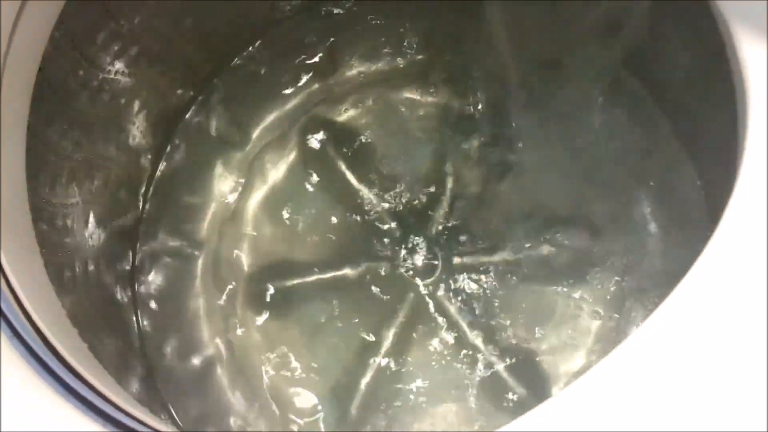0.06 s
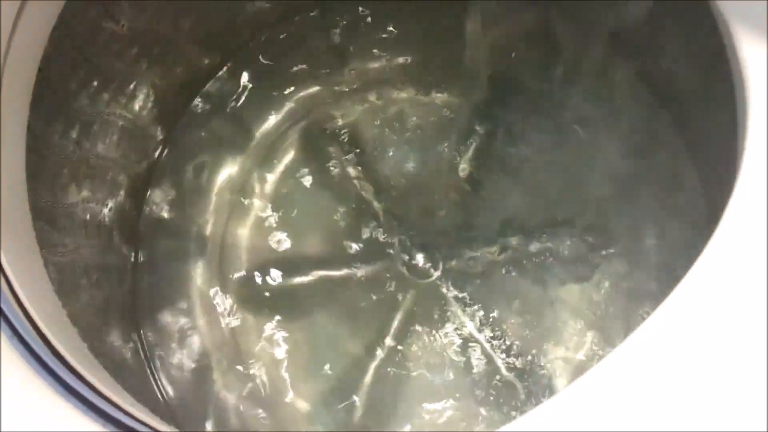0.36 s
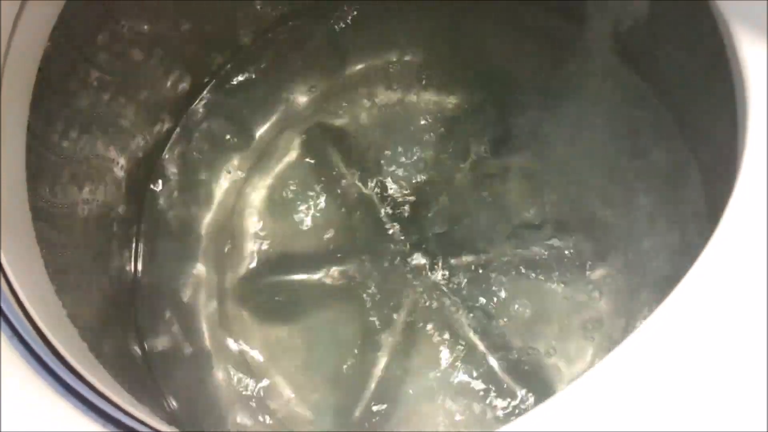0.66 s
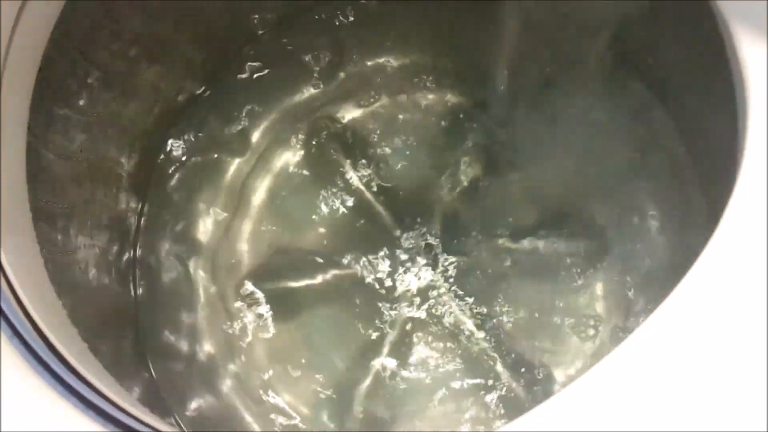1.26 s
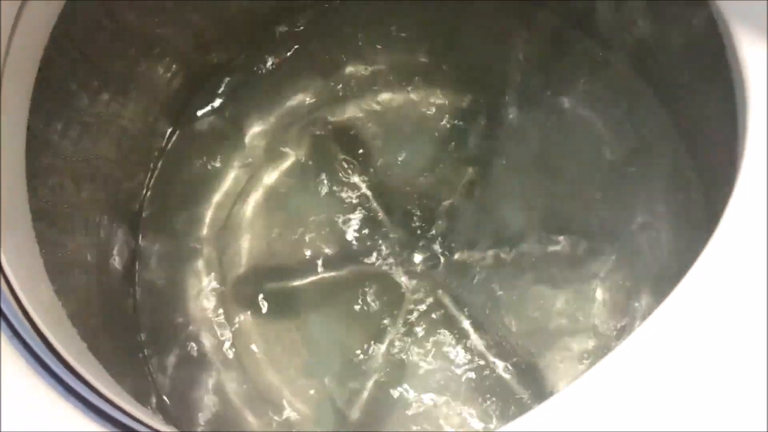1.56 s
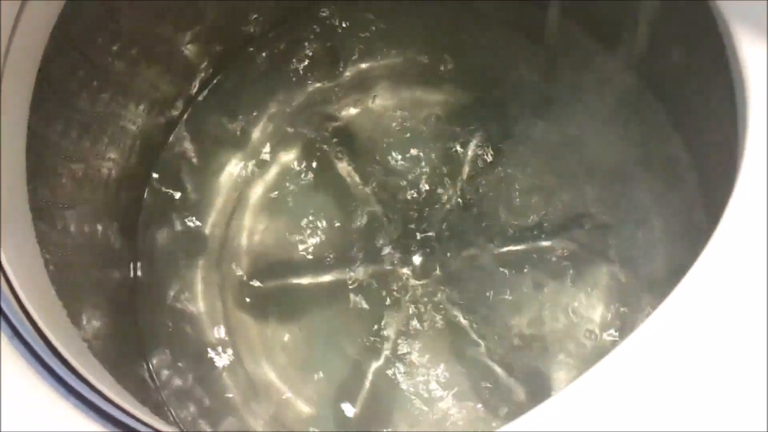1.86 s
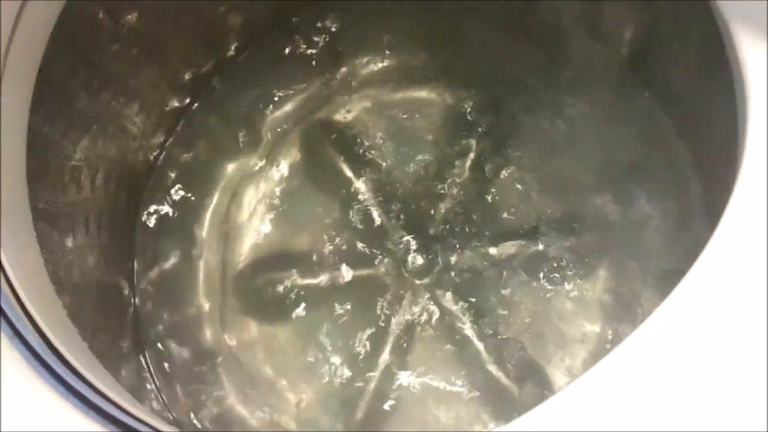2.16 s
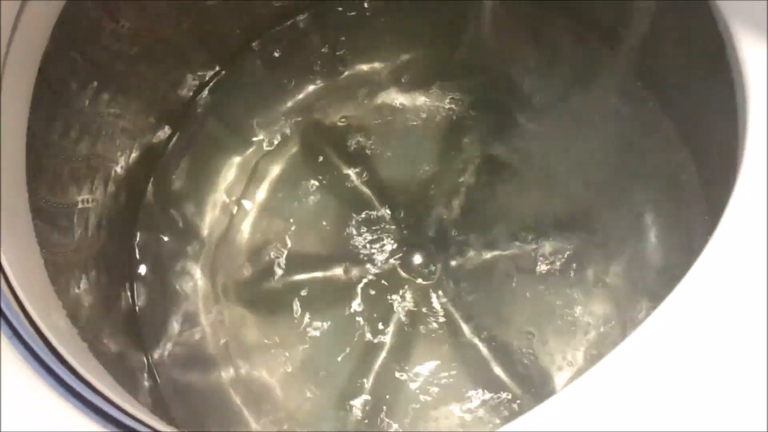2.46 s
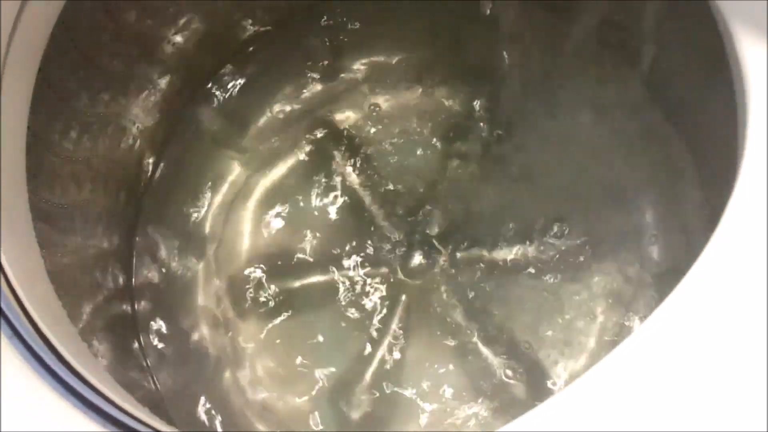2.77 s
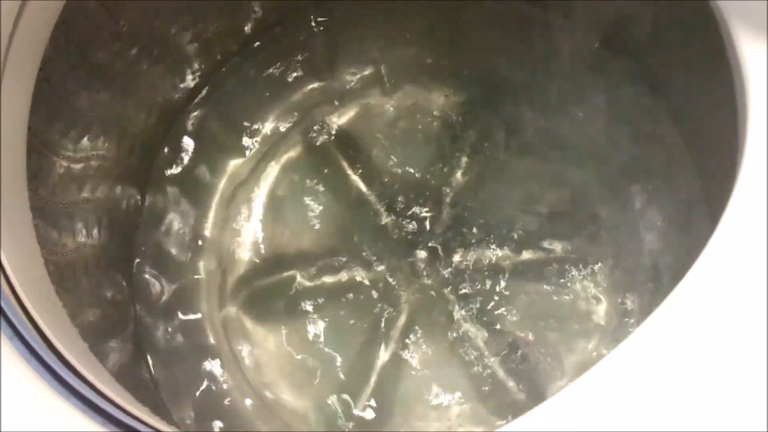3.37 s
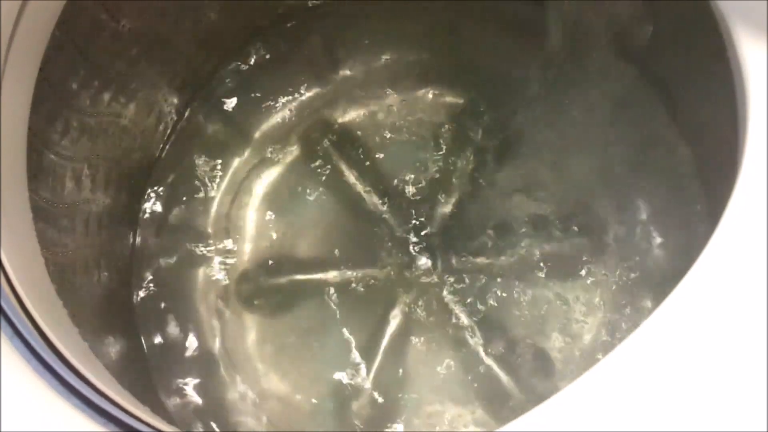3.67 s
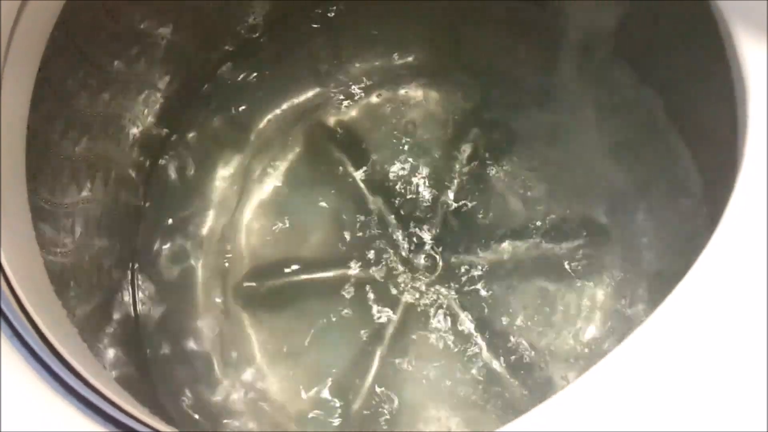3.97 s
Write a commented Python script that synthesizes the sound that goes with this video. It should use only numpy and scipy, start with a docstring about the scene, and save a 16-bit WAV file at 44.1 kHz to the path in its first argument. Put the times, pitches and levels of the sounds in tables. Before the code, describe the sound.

Heard from close above, a stream of water splashes into a filling washing machine, with tinkling bubbles, fat drips and small gurgles. The splashing dips briefly and returns, echoing in the metal drum while the machine hums and rumbles softly.

```python
"""Water falls into the part-filled steel drum of a top-loading washer, one microphone close overhead.
From the start, drops patter on the surface and trap ringing bubbles, over valve hum and a low rumble.
Almost at once a pocket of air gulps, a fat drop slaps and a jet plunges; these return now and then.
The splashing eases around two seconds in, swells near three, dips and surges briefly at the end.
Throughout, the drum rings and echoes with the water."""
import sys
import numpy as np
from scipy import signal
from scipy.fft import rfft, irfft
from scipy.io import wavfile

SR = 44100
rng = np.random.default_rng(int(sys.argv[2]) if len(sys.argv) > 2 else 0)


def wav_record(signal):
    """Record a signal, one row per channel, as 16-bit PCM in the file named by sys.argv[1]."""
    frames = np.transpose(np.atleast_2d(signal))
    bounded = np.clip(frames, -1, 1)
    # unit amplitude maps onto the largest positive 16-bit level
    quanta = np.round(bounded * 32767).astype(np.int16)
    wavfile.write(sys.argv[1], SR, quanta)


N = 176400
TIME = np.arange(N) / SR

# How hard the stream splashes. Each row: time in seconds, relative level in dB.
SPLASH_LEVEL = [(0.0, -14.5), (0.06, -21.5), (0.21, -20), (0.243, -25), (0.275, -20.5), (0.62, -23),
                (0.79, -20), (0.88, -26.5), (1.08, -21), (1.15, -25.5), (1.195, -19.5), (1.23, -20.5),
                (1.32, -18.5), (1.65, -20), (1.71, -21), (1.765, -17.5), (1.9, -27.5), (1.96, -24),
                (2.01, -27), (2.21, -29), (2.33, -25), (2.43, -31), (2.48, -24.5), (2.55, -23.5),
                (2.69, -19.5), (2.83, -21.5), (3.05, -18), (3.3, -23.5), (3.44, -24.5), (3.6, -27),
                (3.64, -24), (3.77, -25.5), (3.93, -20), (4.0, -26)]
# Tone colours of the steady layers. Each row: frequency in Hz, relative gain in dB.
SPRAY_COLOUR = [(500, -36), (1200, -26.5), (2200, -18), (3500, -7), (4400, -1.5), (5250, 3), (6000, -4.5),
                (7000, -11), (8300, -24), (10800, -41), (12500, -25), (15500, -41.5)]
MIST_COLOUR = [(2000, -30.5), (4000, -26), (5250, 10), (7000, -19), (8500, -8.5), (10800, -5.5),
               (12500, -17), (15500, -48)]
TINKLE_COLOUR = [(2000, -10), (2600, -7), (3500, -3), (4400, -6), (5250, 5.5), (6000, -1.5), (7000, -9.5),
                 (8500, -15), (11000, -29)]
FIZZ_COLOUR = [(550, -13), (800, -7.5), (1200, -8.5), (1600, -2), (2400, -1.5), (5000, -6), (7000, -15.5)]
GURGLE_COLOUR = [(100, -7.5), (150, -1.5), (220, -0.5), (290, -7.5), (370, -5), (450, -2.5), (560, -11.5),
                 (750, -21)]
RUMBLE_COLOUR = [(15, 1.5), (29, -0.5), (44, -0.5), (58, 6), (75, -6), (110, -3), (200, -9), (400, -26),
                 (800, -28.5), (3000, -71)]
# Hum of the inlet valve. Each row: frequency in Hz, rms level in dB.
VALVE_HUM = [(29.5, -45.5), (60, -58.5), (120, -54.5), (180, -58)]
# Modes of the air in the drum. Each row: frequency in Hz, relative gain in dB.
AIR_MODES = [(357, -1), (390, -1), (560, 0), (980, -3), (1085, -1), (1263, -2), (1415, -2), (1550, -4),
             (1976, -5), (2231, -6), (2499, -7), (2649, -7)]
# Air trapped under the surface. Each row: start in seconds, relative level in dB, pitch in Hz.
AIR_GULPS = [(0.04, -20.5, 191), (0.245, -27, 215), (0.733, -28, 444), (1.229, -22.5, 178),
             (1.232, -23, 460), (1.33, -27, 353), (1.48, -25.5, 205), (1.698, -27, 439), (2.14, -35, 550),
             (2.44, -31, 750), (2.451, -24, 180), (2.489, -23, 205), (2.698, -25, 215), (2.872, -23, 365),
             (3.102, -26, 180), (3.105, -29, 400), (3.425, -27, 425), (3.715, -26, 215), (3.948, -25, 198)]
JET_PLUNGES = [(0.11, -26, 2570), (0.186, -22, 2490), (0.464, -30, 1300), (0.733, -29, 1650),
               (1.2855, -22, 2000), (1.572, -25, 1790), (1.6367, -17.5, 1950), (1.755, -21, 2700),
               (2.278, -33, 1250), (2.8539, -19, 2190), (2.915, -22, 2200), (3.089, -23, 2700),
               (3.6277, -23, 2900), (3.66, -25, 2180), (3.9085, -21, 2420)]
# Slaps of fat drops. Each row: start in seconds, relative level in dB, frequency in Hz of the ring
# it sets off, mostly the microphone's resonance.
FAT_DROPS = [(0.0837, -6, 5320), (0.1835, -9, 4400), (0.2653, -7, 5470), (0.2714, -6, 5100),
             (0.3376, -10, 5240), (0.5382, -7, 5040), (0.7018, -5.5, 5250), (1.1623, -8.5, 5120),
             (1.4272, -7, 5040), (1.6038, -7.5, 5120), (1.6297, -3.5, 4510), (1.7804, -5.5, 5050),
             (1.8277, -9, 3900), (1.8357, -9, 5600), (1.9425, -6, 5260), (2.2443, -13, 5510),
             (2.772, -7, 6200), (2.8489, -7.5, 5760), (2.9043, -9, 5010), (3.0066, -8.5, 4970),
             (3.1043, -4, 4600), (3.1787, -5, 4900), (3.2535, -4.5, 3540), (3.3513, -9.5, 5290),
             (3.4989, -9, 5390), (3.5533, -7, 5250), (3.636, -12, 4400)]

CLUMPS_PER_S, CLUMP_DECAY_S, CLUMP_DEPTH = 80, 0.006, 0.6
MIST_FOLLOWS, FIZZ_FOLLOWS, GURGLE_FOLLOWS = 0.81, 0.76, 0.69   # share of the stream's swing in dB
BUBBLE_RISE = 0.07   # fraction by which the pitch climbs
MODE_WIDTH_HZ, DRUM_T60_S, ECHO_DB, FIRST_ECHO_S = 18, 0.13, -4.5, 0.001813
CLOUD_COUNT, CLOUD_DB, CLOUD_SPAN_S, CLOUD_OCTAVES = 14, -11, 0.032, 0.33
SCATTER_DB, SCATTER_DECAY_S, SLAP_SOFTNESS_HZ = -9, 0.0065, 7900
CUTOFF_HZ = 15500


def from_db(db):
    """Decibels to gain."""
    return 10 ** (np.asarray(db) / 20)


def rms_one(x):
    """Scale to unit power."""
    return x / np.sqrt(np.mean(x ** 2) + 1e-20)


def add(out, s, sound):
    """Mix a sound in at s seconds."""
    start = int(np.clip(s * SR, 0, N - 1))
    out[start:start + len(sound)] += sound[:N - start]


def colour(x, points):
    """Minimum-phase filter through (Hz, dB) points; the result has unit power."""
    hz, db = np.transpose(points)
    grid_hz = np.maximum(np.arange(N + 1) * SR / (2 * N), 1)
    gain = from_db(np.interp(np.log(grid_hz), np.log(hz), db))
    cepstrum = irfft(np.log(gain))
    response = np.exp(rfft(2 * cepstrum[:N], 2 * N))
    return rms_one(irfft(rfft(x, 2 * N) * response)[:N])


def dying(kicks, decay_s):
    """Each kick fades exponentially."""
    return signal.lfilter([1], [1, -np.exp(-1 / (decay_s * SR))], kicks + 1e-18)


def sizes(spread_db):
    """A random strength for each sample: many small, a few large, of either sign."""
    return from_db(spread_db * np.minimum(rng.exponential(1, N), 3.8)) * rng.choice([-1, 1], N)


def stream():
    """The strength of the splashing, as a gain over time."""
    return from_db(np.interp(TIME, *np.transpose(SPLASH_LEVEL)))


def clumping():
    """The stream breaks into clumps that start at once and thin out; overlapping clumps add in power."""
    starts = (rng.random(N) < CLUMPS_PER_S / SR) * rng.uniform(.5, 1, N)
    power = dying(starts, CLUMP_DECAY_S / 2)
    return 1 - CLUMP_DEPTH + CLUMP_DEPTH * rms_one(np.sqrt(power))


def patter(per_s, spread_db):
    """Drops land as random ticks of uneven size."""
    return (rng.random(N) < per_s / SR) * sizes(spread_db)


def spray():
    """Thousands of drops tick on the surface; the finest hiss in the same clumps and swell less."""
    clumps = clumping()
    drops = colour(clumps * patter(per_s=7000, spread_db=2.5), SPRAY_COLOUR)
    mist = colour(clumps * patter(per_s=7100, spread_db=4.5), MIST_COLOUR)
    return from_db(-5.5) * stream() * drops + from_db(-19) * stream() ** MIST_FOLLOWS * mist


def ring(hz, cycles):
    """A sine dies 60 dB over its cycles and climbs a little, as a bubble does nearing the surface."""
    turns = np.arange(int(cycles * SR / hz)) * hz / SR
    age = turns / cycles
    envelope = from_db(-60 * age) * (1 - np.exp(-2 * turns))
    return envelope * np.sin(2 * np.pi * turns * (1 + BUBBLE_RISE * age / 2))


def swarm(spectrum, per_s, spread_db, cycles):
    """Bubbles ring at random pitches across a spectrum, louder in clumps."""
    out = np.zeros(N)
    born = rng.random(N) < per_s / SR
    strength = sizes(spread_db) * clumping()
    hz = rng.uniform(spectrum[0][0], spectrum[-1][0], N)
    for i in np.flatnonzero(born):
        add(out, TIME[i], strength[i] * np.sqrt(hz[i]) * ring(hz[i], cycles))
    return colour(out, spectrum)


def bubbles():
    """Trapped air: tiny bubbles tinkle, larger ones fizz and plunge, the largest gurgle and gulp."""
    tinkle = swarm(TINKLE_COLOUR, per_s=3300, spread_db=4.5, cycles=79)
    fizz = swarm(FIZZ_COLOUR, per_s=2600, spread_db=1.3, cycles=41.5)
    gurgle = swarm(GURGLE_COLOUR, per_s=500, spread_db=1.7, cycles=14.6)
    tinkle *= from_db(-4.5) * stream()
    fizz *= from_db(-37.5) * rms_one(stream() ** FIZZ_FOLLOWS)
    gurgle *= from_db(-43.5) * rms_one(stream() ** GURGLE_FOLLOWS)
    return tinkle + fizz + gurgle + plunges() + gulps()


def walls(x):
    """Dense short echoes between the steel walls reach the microphone just behind the direct sound."""
    t = TIME[:SR // 2]
    echoes = rng.standard_normal(len(t)) * from_db(-60 * t / DRUM_T60_S) * (t > FIRST_ECHO_S)
    return x + from_db(ECHO_DB) * signal.fftconvolve(x, echoes / np.linalg.norm(echoes))[:N]


def drum(x):
    """The air in the drum rings at its modes."""
    modes = sum(from_db(db) * signal.lfilter(*signal.iirpeak(hz, hz / MODE_WIDTH_HZ, fs=SR), x)
                for hz, db in AIR_MODES)
    return from_db(-2.5) * (x + modes)


def machine():
    """The inlet valve hums over the rumble of the cabinet."""
    hum = sum(from_db(db) * np.sqrt(2) * np.sin(2 * np.pi * (hz * TIME + rng.random()))
              for hz, db in VALVE_HUM)
    rumble = from_db(-39) * colour(rng.standard_normal(N), RUMBLE_COLOUR)
    return hum + rumble


def single_rings(rows, cycles):
    """One ring for each row."""
    out = np.zeros(N)
    for s, db, hz in rows:
        add(out, s, from_db(db) * ring(hz, cycles))
    return out


def air_pockets(rows, cycles):
    """Each pocket rings as one main bubble; a cloud of weaker ones tears off around its pitch."""
    out = single_rings(rows, cycles)
    for s, db, hz in rows:
        lateness = rng.random(CLOUD_COUNT)
        starts = s + CLOUD_SPAN_S * lateness
        levels = db + CLOUD_DB * (1 + lateness / 2)
        pitches = hz * 2 ** (CLOUD_OCTAVES * rng.standard_normal(CLOUD_COUNT))
        out += single_rings(zip(starts, levels, pitches), cycles)
    return out


def gulps():
    """Large pockets of air ring low."""
    return from_db(-1) * air_pockets(AIR_GULPS, cycles=28.4)


def slaps():
    """Each fat drop slaps and scatters droplets; most set off the microphone's brief ring near 5.2 kHz."""
    kicks = np.zeros(N)
    for s, db, _ in FAT_DROPS:
        add(kicks, s, from_db([db + SCATTER_DB]))
    scatter = dying(kicks, SCATTER_DECAY_S) * colour(rng.standard_normal(N), SPRAY_COLOUR)
    mic_ring = from_db(1) * single_rings(FAT_DROPS, cycles=66)
    return signal.sosfilt(signal.butter(2, SLAP_SOFTNESS_HZ, fs=SR, output="sos"), mic_ring + scatter)


def plunges():
    """A jet drags air under with a hollow splash."""
    return from_db(4) * air_pockets(JET_PLUNGES, cycles=62)


def scene():
    """Close over the drum: each water sound has its own place and echoes; the machine hums beneath."""
    water = sum(walls(source()) for source in (spray, bubbles, slaps))
    return (drum(water) + machine())[None]


def record(dry):
    """The microphone's one channel, with the top cut steeply."""
    return signal.sosfilt(signal.ellip(10, .1, 80, CUTOFF_HZ, fs=SR, output="sos"), dry)


dry = scene()
out = record(dry)
wav_record(out)
```